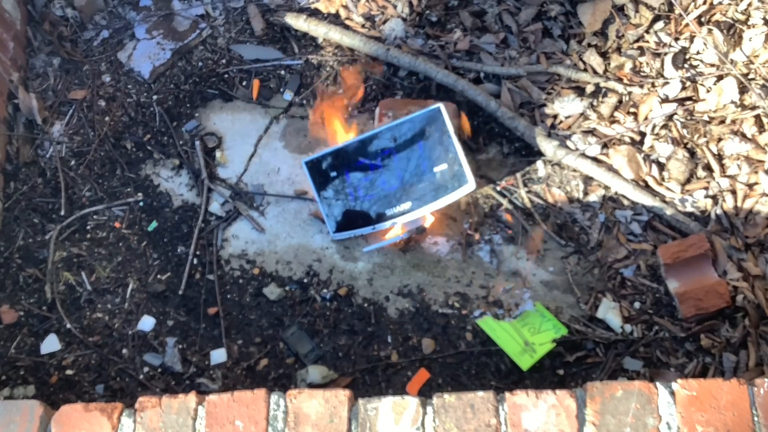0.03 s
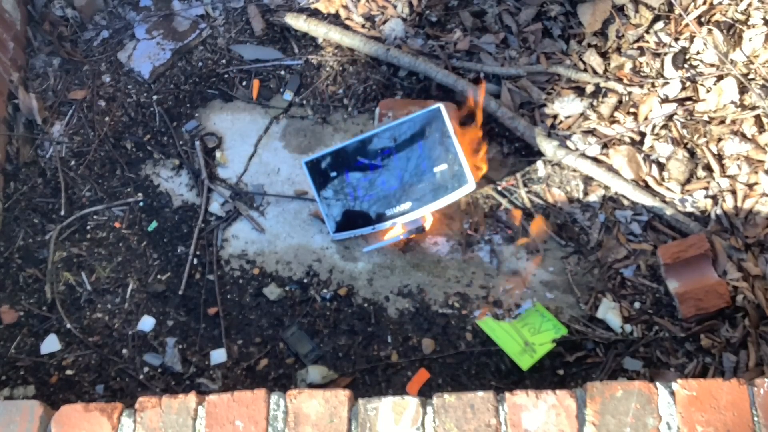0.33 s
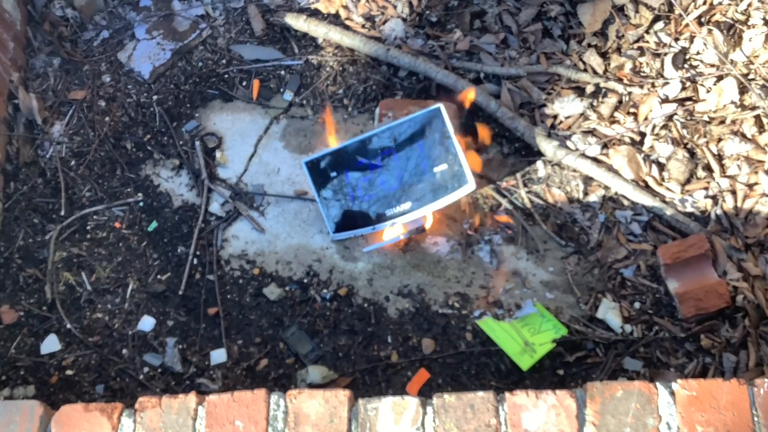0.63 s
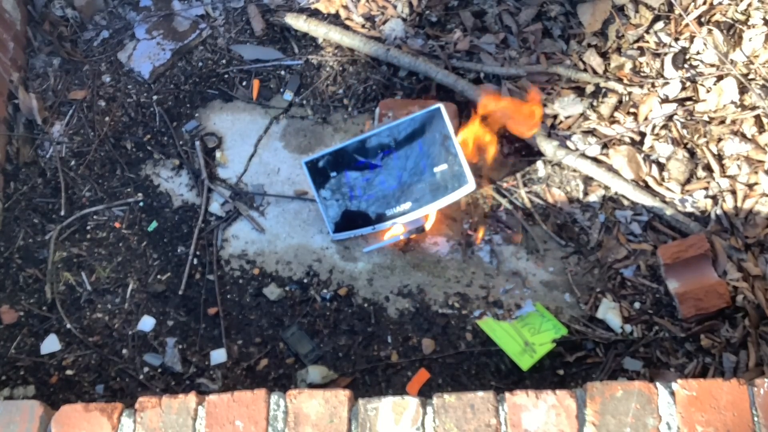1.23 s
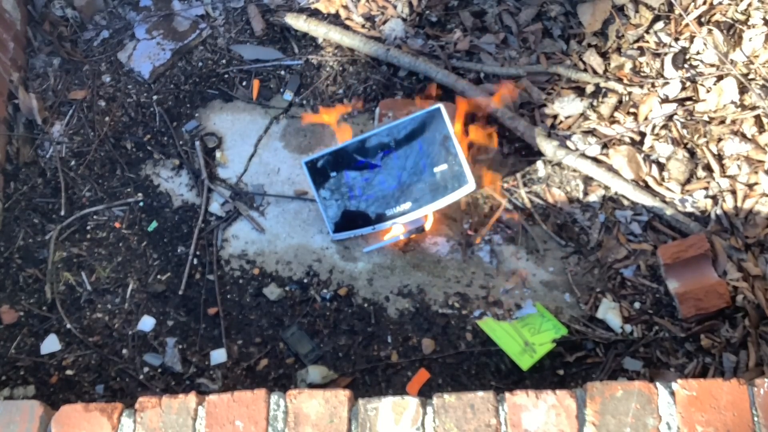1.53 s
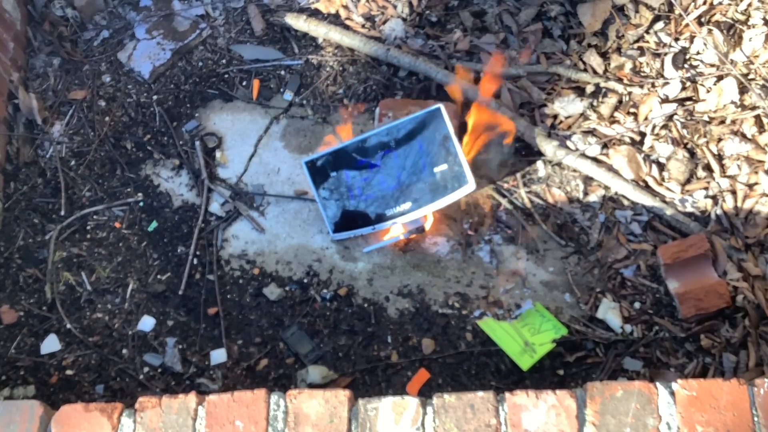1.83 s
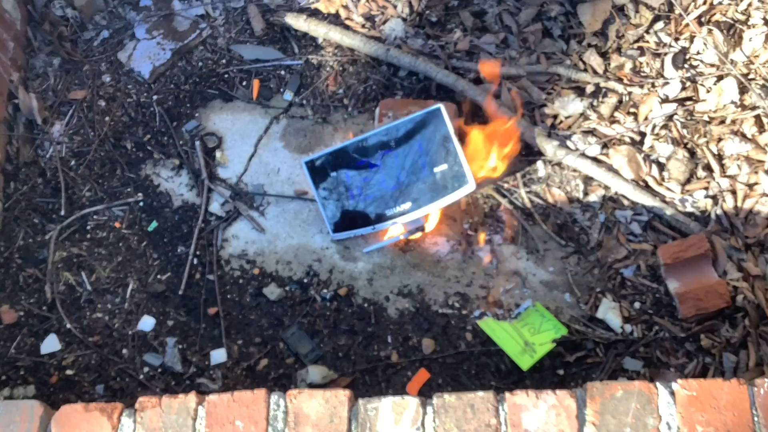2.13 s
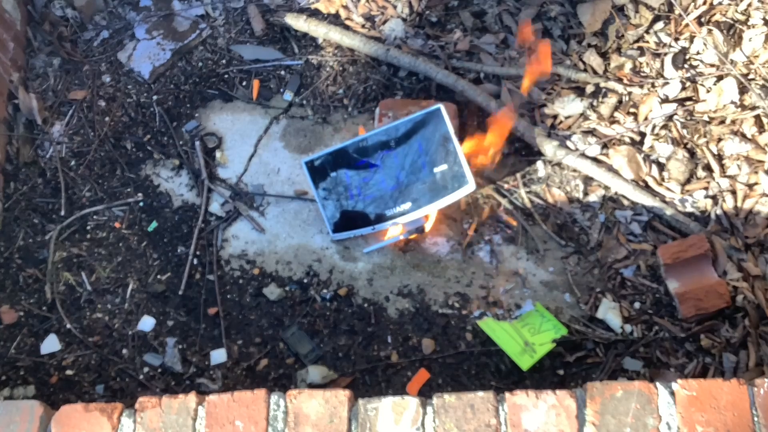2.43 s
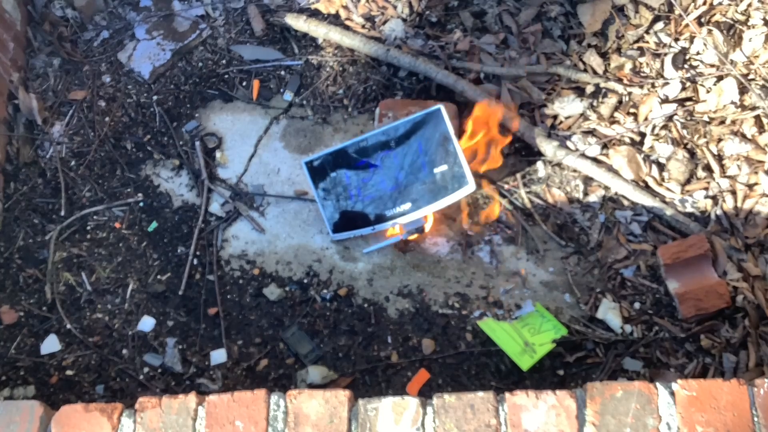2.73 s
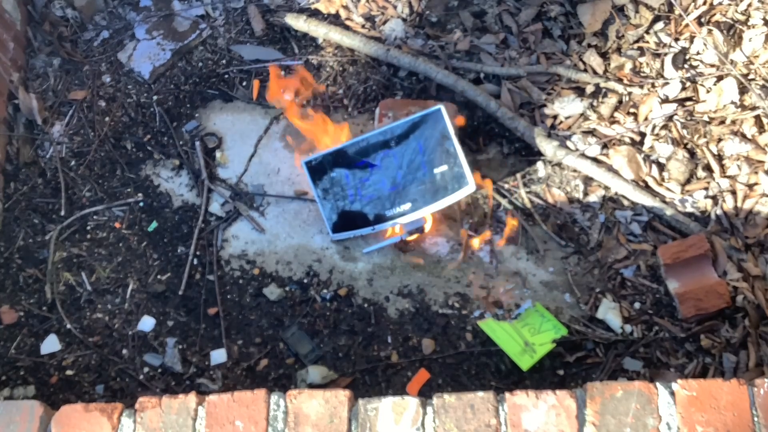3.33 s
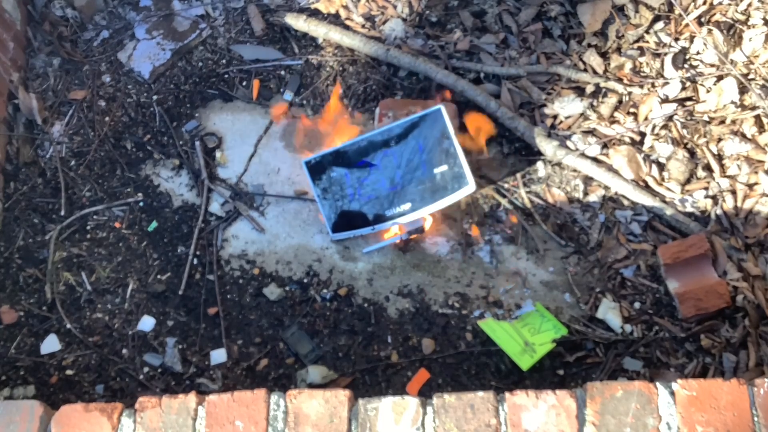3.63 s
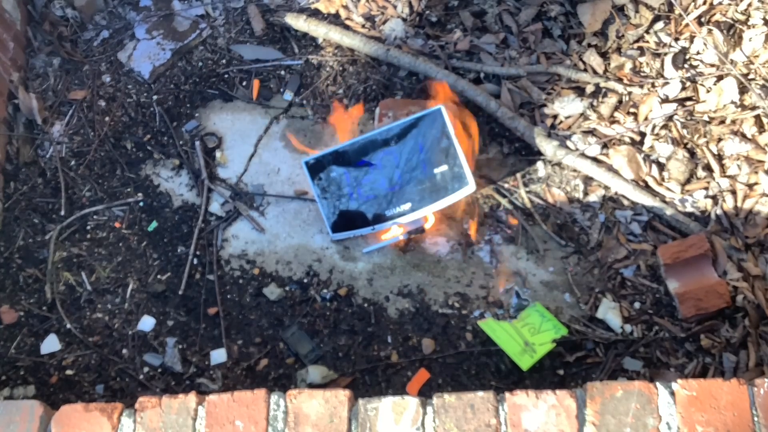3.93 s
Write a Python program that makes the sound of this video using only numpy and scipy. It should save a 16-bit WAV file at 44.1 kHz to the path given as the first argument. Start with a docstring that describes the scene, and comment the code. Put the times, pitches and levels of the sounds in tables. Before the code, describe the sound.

Fire burning a small plastic device outdoors, with a low flame rumble and sharp crackles.

```python
"""Small plastic device burning in a yard

Heard from about a metre, on a slab in light wind. The flame rumbles, flaps and flickers as air feeds it.
The hot casing snaps and ticks, with a short echo. Gas spits out of the melt;
late on, blisters pop and a thin whistle lingers."""
import sys
import numpy as np
from scipy import signal
from scipy.fft import rfft, irfft
from scipy.io import wavfile

SR = 44100
rng = np.random.default_rng(int(sys.argv[2]) if len(sys.argv) > 2 else 0)


def persist_wave(psi):
    """Save psi, clipped to +-1, as 16-bit WAV."""
    counts = np.round(np.clip(psi, -1, 1) * 32767).astype(np.int16)
    wavfile.write(sys.argv[1], SR, np.atleast_2d(counts).T)


N = 176400
TIME_S = np.arange(N) / SR


def undb(db):
    """Decibels to gain."""
    return 10 ** (np.asarray(db) / 20)


def unit(x):
    """Scale to rms 1."""
    return x / np.sqrt(np.mean(x ** 2))


def curve(table, column=1):
    """Gain over time from one dB column."""
    rows = np.array(table)
    return undb(np.interp(TIME_S, rows[:, 0], rows[:, column]))


def noise(spectrum):
    """Noise of rms 1, minimum-phase filtered to (f/Hz, level/dB) points."""
    hz, db = np.array(spectrum).T
    f = np.maximum(np.arange(N + 1) * SR / (2 * N), 1)
    cepstrum = irfft(np.log(undb(np.interp(np.log(f), np.log(hz), db))))
    causal_fold = np.r_[1, np.full(N - 1, 2), 1, np.zeros(N - 1)]
    response = np.exp(rfft(cepstrum * causal_fold))
    return unit(irfft(rfft(rng.standard_normal(N), 2 * N) * response)[:N])


def walk(rate_hz):
    """Smooth random drift of rms 1, up to about rate_hz."""
    f = np.arange(N // 2 + 1) * SR / N
    band = f / (f + rate_hz / 10) * np.exp(-(f / rate_hz) ** 2)
    return unit(irfft(rfft(rng.standard_normal(N)) * band, N))


def swell(start_s, rise_s, decay_s):
    """Envelope: smooth rise, exponential decay."""
    age_s = np.maximum(TIME_S - start_s, 0)
    return (1 - np.exp(-(age_s / rise_s) ** 2)) * np.exp(-age_s / decay_s)


# Flame strength: t/s, rumble/dB, roar/dB, hiss/dB
FLAME_LEVELS = [(0, -43.5, -58.5, -72), (.08, -46, -51.5, -74), (.2, -44.5, -52, -75),
                (.33, -46.5, -50.5, -69.5), (.45, -46.5, -55, -78), (.58, -47.5, -60, -88.5),
                (.67, -46, -54, -69.5), (.78, -48, -54, -75.5), (.95, -49.5, -57.5, -77.5),
                (1.34, -50, -59, -84), (1.42, -48, -53, -79), (1.68, -50.5, -63, -80.5),
                (2.15, -51, -62, -88), (2.35, -53, -63, -83.5), (2.95, -55, -63.5, -87.5),
                (3.3, -52.5, -61.5, -84), (3.6, -53.5, -60, -82), (3.77, -57, -63.5, -84),
                (3.86, -48, -60.5, -80.5), (4, -45.5, -53.5, -91)]
# Flame spectra: f/Hz, relative level/dB
RUMBLE_SPECTRUM = [(22, -68.5), (38, -39.5), (52, -17.5), (73, 1), (100, 0), (140, -0.5), (185, -2.5),
                   (235, -12.5), (400, -20), (900, -68.5)]
ROAR_SPECTRUM = [(40, -32), (120, -22.5), (230, -2.5), (320, 1.5), (420, -2), (540, 3), (660, -3.5),
                 (860, -3.5), (1300, -19.5), (1570, -12), (2100, -19.5), (2800, -29), (5000, -57.5)]
HISS_SPECTRUM = [(1200, 2.5), (2200, 7.5), (2850, 4.5), (3600, 5.5), (5300, 0), (7200, -7), (9500, -10),
                 (12000, -18), (16000, -13)]
# Brief surges and small flickers: t/s, roar/dB, hiss/dB
SURGES = [(0.026, -46, -79), (0.2, -48, -71), (0.265, -52, -60.5), (0.311, -52, -73), (0.356, -53, -77),
          (0.387, -44.5, -67), (0.48, -45, -70), (0.525, -45.5, -65), (0.56, -52, -70), (0.632, -42.5, -69),
          (.668, -51, -67), (.72, -56, -73), (0.741, -41, -75), (0.778, -45, -70), (0.899, -45.5, -76),
          (0.989, -50, -63), (1.171, -47, -78), (1.269, -55, -72), (1.39, -49.5, -62), (1.451, -45, -61),
          (1.633, -46, -71), (1.902, -49, -66), (2.02, -45.5, -77), (2.192, -50, -74), (2.485, -51.5, -76),
          (2.539, -48.5, -66.5), (2.827, -53, -85), (3.215, -49.5, -79), (3.318, -56, -85),
          (3.589, -47, -68), (3.842, -47.5, -68), (3.981, -50.5, -81)]

def flame(rumble_flutter_db=1.35, roar_flutter_db=2.5, hiss_flutter_db=1.5):
    """Air-fed flame: over a rumble, roar and hiss flutter together, with brief surges and flickers."""
    flutter = unit(walk(45) + 1.34 * walk(300))
    rumble = noise(RUMBLE_SPECTRUM) * curve(FLAME_LEVELS, column=1) * undb(rumble_flutter_db * walk(29))
    roar_gain = curve(FLAME_LEVELS, column=2) * undb(roar_flutter_db * flutter)
    hiss_gain = curve(FLAME_LEVELS, column=3) * undb(hiss_flutter_db * flutter)
    surge_roar, surge_hiss = np.zeros((2, N))
    for at_s, roar_db, hiss_db in SURGES:
        surge = swell(at_s - 0.001, rise_s=0.001, decay_s=0.011)
        surge_roar += undb(roar_db) * surge
        surge_hiss += undb(hiss_db) * surge
    roar = noise(ROAR_SPECTRUM) * np.hypot(roar_gain, surge_roar)
    hiss = noise(HISS_SPECTRUM) * np.hypot(hiss_gain, surge_hiss)
    return rumble + roar + hiss


# Flame flaps: t/s, level/dB, f/Hz
FLAPS = [(.332, -28.5, 111), (0.661, -31, 105), (0.692, -35, 95), (1.4, -42.5, 313), (1.404, -32, 92),
         (1.446, -38, 132), (1.765, -36, 109), (2.136, -41.5, 186), (2.188, -38, 91), (2.61, -42, 99),
         (2.775, -44, 163), (2.773, -45, 293), (3.03, -37, 119), (3.334, -37, 90)]

def flaps(sigma_s=0.0037):
    """The flame sheet flaps: one low Gaussian tone pulse each time."""
    out = np.zeros(N)
    for at_s, db, hz in FLAPS:
        age_s = TIME_S - at_s
        envelope = undb(db) * np.exp(-0.5 * (age_s / sigma_s) ** 2)
        out += envelope * np.sin(2 * np.pi * (hz * age_s + rng.random()))
    return out


def fracture(low_hz, high_hz, crack_s=0.00055, scatter_s=0.0051, echo_s=0.021):
    """One fracture: spike and brief crack, ground scatter, treble echo of the yard."""
    t = np.arange(SR // 4) / SR
    crack, scatter, echo = (rng.standard_normal(len(t)) * np.exp(-t / decay_s) * np.sqrt(2 / (decay_s * SR))
                            for decay_s in (crack_s, scatter_s, echo_s))
    echo = signal.sosfilt(signal.butter(1, [3500, 11000], "band", fs=SR, output="sos"), echo)
    spike = 0.59 * (t == 0)
    burst = spike + undb(-7.5) * crack + undb(-8) * scatter + undb(-11.5) * echo
    highpass = signal.butter(3, low_hz, "high", fs=SR, output="sos")
    lowpass = signal.butter(2, high_hz, fs=SR, output="sos")
    return signal.sosfilt(np.vstack([highpass, lowpass]), burst)


# Casing snaps: t/s, level before filtering/dB, low edge/Hz, high edge/Hz
SNAPS = [(0.0159, -23.5, 4060, 19000), (0.0535, -33.5, 2000, 8000), (0.228, -24, 3080, 12800),
         (.3808, -41.5, 2500, 8500), (0.4978, -33, 8100, 9500), (.7175, -45, 8000, 11000),
         (.7463, -31, 1300, 3500), (0.7935, -35, 2500, 5000), (0.8017, -41, 2500, 9000),
         (0.8972, -39.5, 1200, 4000), (0.9512, -28, 4300, 17000), (1.14, -42, 8000, 16000),
         (1.2092, -43, 11500, 17000), (1.386, -40, 2500, 7350), (1.4497, -45, 2000, 6960),
         (1.562, -38.5, 3000, 7000), (1.769, -30, 3900, 12000), (1.959, -17.3, 1490, 8400),
         (2.0199, -31.5, 1550, 4500), (2.0337, -31.5, 3320, 12000), (3.25, -27, 1290, 2740),
         (3.321, -31, 1290, 2350), (3.6125, -40, 8000, 12000), (3.6677, -44.5, 2500, 6000),
         (3.7049, -30.5, 2880, 8500)]

def snaps():
    """Loud single fractures of the hot casing."""
    out = np.zeros(N)
    for at_s, db, low_hz, high_hz in SNAPS:
        start = int(at_s * SR)
        burst = fracture(low_hz, high_hz)[:N - start]
        out[start:start + len(burst)] += undb(db) * burst
    return out


def ticks(rate_per_s=60, drive_db=-84.5, spread_db=2, cluster_hz=15, cluster_db=3):
    """Faint fractures in sputters, growing with the flame's hiss."""
    gaps, sizes = rng.exponential(size=1000), rng.standard_normal(1000)
    starts = (np.cumsum(gaps) / rate_per_s * SR).astype(int)
    inside = starts < N
    impulses = np.zeros(N)
    impulses[starts[inside]] = undb(spread_db * np.minimum(sizes[inside], 1))
    impulses *= curve(FLAME_LEVELS, column=3) * undb(cluster_db * walk(cluster_hz))
    ticking = signal.fftconvolve(impulses, fracture(low_hz=1950, high_hz=6000))[:N]
    return undb(drive_db) * unit(ticking)


# Casing modes: f/Hz, gain/dB, decay/s
CASING_MODES = [(1970, 4.5, 0.00036), (3630, 5, 0.00051), (5090, -1.5, 0.0004), (8830, -1, 0.00017),
                (10900, -10, .0003), (15500, -3, .0004)]

def casing(fractures, direct_db=-8.5):
    """Fractures heard directly and through the casing's short-lived modes."""
    t = np.arange(SR // 50) / SR
    ring = sum(undb(db) * 2 / (decay_s * SR) * np.exp(-t / decay_s) * np.cos(2 * np.pi * hz * t)
               for hz, db, decay_s in CASING_MODES)
    return undb(direct_db) * fractures + signal.fftconvolve(fractures, ring)[:N]


# Gas spits: t/s, level/dB, rise/s, decay/s
SPITS = [(.03, -68, 0.018, 0.054), (.49, -55.5, 0.011, 0.015), (.98, -66.5, 0.0045, 0.018),
         (1.775, -70, .016, 0.036), (2.005, -60.5, 0.019, 0.035), (3.2, -53.5, 0.016, 0.018),
         (3.26, -67.5, 0.063, 0.11)]
# Spit spectrum: f/Hz, relative level/dB
SPIT_SPECTRUM = [(1500, 3.5), (3500, 2.5), (5000, 3), (7000, -4), (9500, 0), (12000, -18), (15000, -8)]

def spits(flutter_db=2):
    """Gas sizzles out of the melt in short bursts."""
    envelope = sum(undb(db) * swell(at_s, rise_s, decay_s) for at_s, db, rise_s, decay_s in SPITS)
    return noise(SPIT_SPECTRUM) * undb(flutter_db * walk(250)) * envelope


# Blister pops: t/s, f/Hz, level/dB, rise/s, decay/s
BLISTERS = [(3.3712, 5340, -47, .0004, 0.00061), (3.4275, 3440, -40, 0.00047, 0.00053),
            (3.429, 824, -26.5, 0.0015, 0.0019)]

def blisters():
    """Blisters pop in the melt, each a damped tone."""
    return sum(undb(db) * swell(at_s, rise_s, decay_s) * np.sin(2 * np.pi * hz * (TIME_S - at_s))
               for at_s, hz, db, rise_s, decay_s in BLISTERS)


# Gas whistle: t/s, level/dB
WHISTLE_LEVELS = [(1.2, -102), (3.39, -101), (3.44, -90), (3.68, -87), (3.76, -92), (4, -94)]

def whistle(pitch_hz=6508, width_hz=30):
    """Escaping gas whistles: a narrow band of noise."""
    phase = 2 * np.pi * pitch_hz * TIME_S
    tone = walk(width_hz) * np.sin(phase) + walk(width_hz) * np.cos(phase)
    return tone * curve(WHISTLE_LEVELS)


# Yard air spectrum: f/Hz, relative level/dB
YARD_SPECTRUM = [(22, -62), (40, -7.5), (70, 15.5), (160, 3), (300, -4), (600, -4.5), (1200, -10.5),
                 (1800, -20.5), (2800, -45), (5000, -31), (7500, -35.5), (9500, -33), (12000, -37.5),
                 (16000, -44.5)]

def yard_air(level_db=-57):
    """Steady low rush of outdoor air."""
    return undb(level_db) * noise(YARD_SPECTRUM)


def scene():
    """Yard air, flame, melt and cracking casing, in mono."""
    mix = yard_air() + flame() + flaps() + spits() + whistle() + blisters() + casing(ticks() + snaps())
    return mix[None]


def record(dry, low_cut_hz=47, high_cut_hz=16000):
    """The recorder cuts the deepest bass and the top treble."""
    highpass = signal.butter(4, low_cut_hz, "high", fs=SR, output="sos")
    lowpass = signal.ellip(8, 0.2, 60, high_cut_hz, fs=SR, output="sos")
    return signal.sosfilt(lowpass, signal.sosfilt(highpass, dry))


dry = scene()
out = record(dry)
persist_wave(out)
```